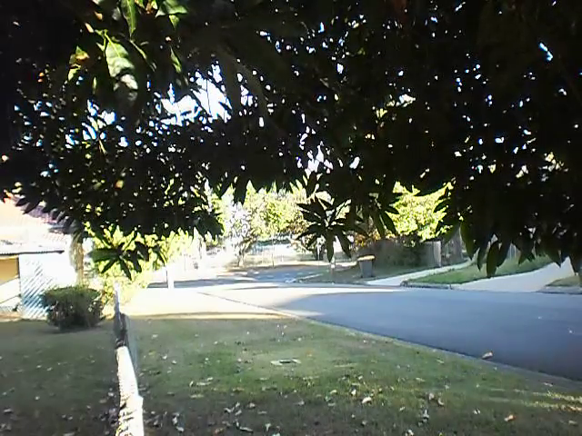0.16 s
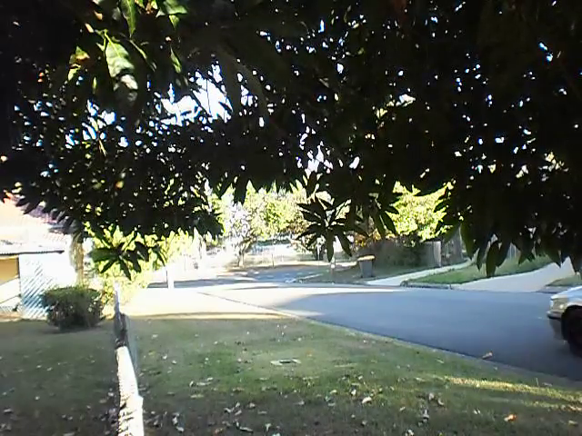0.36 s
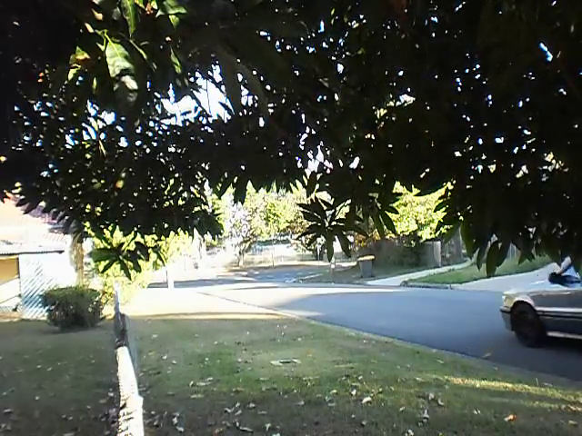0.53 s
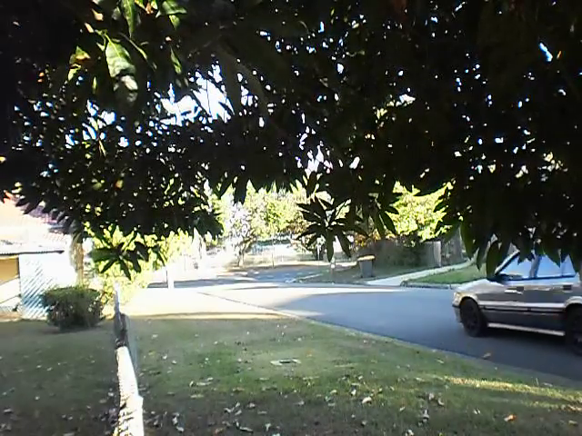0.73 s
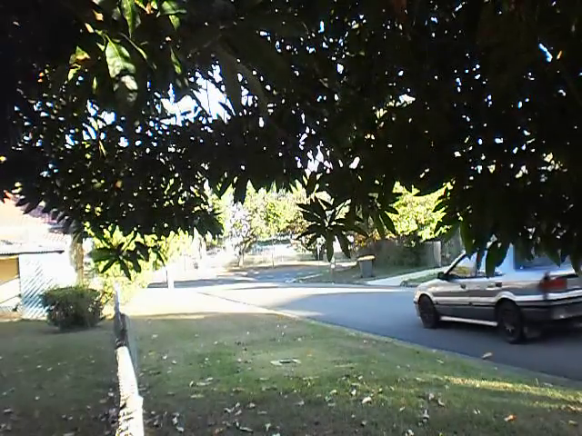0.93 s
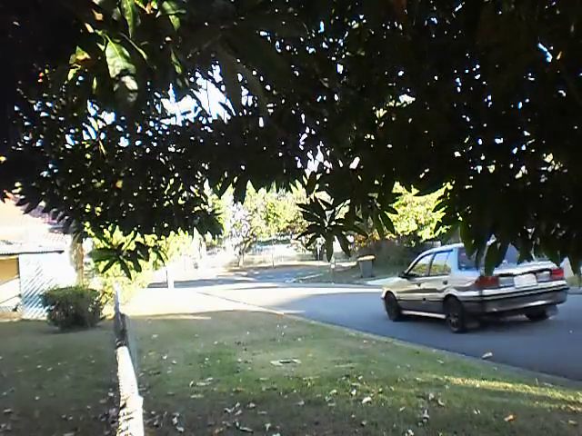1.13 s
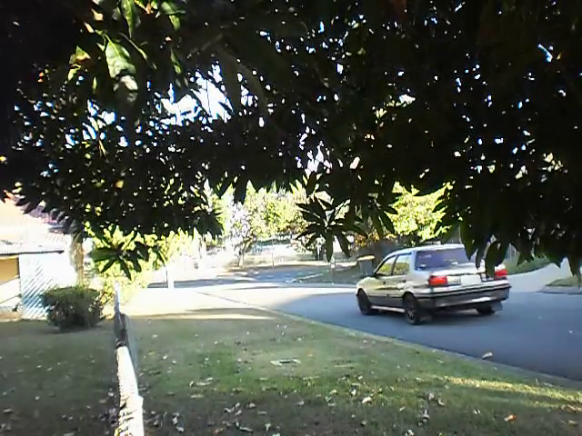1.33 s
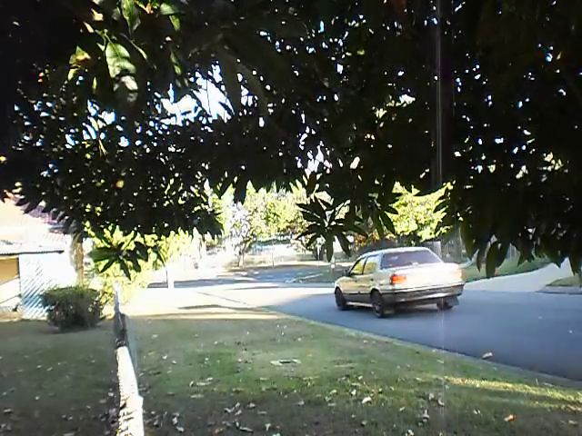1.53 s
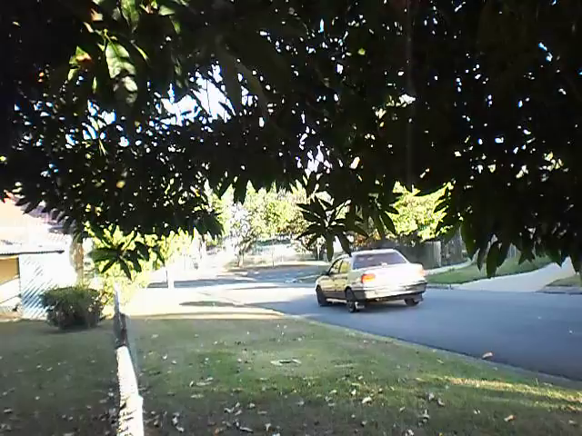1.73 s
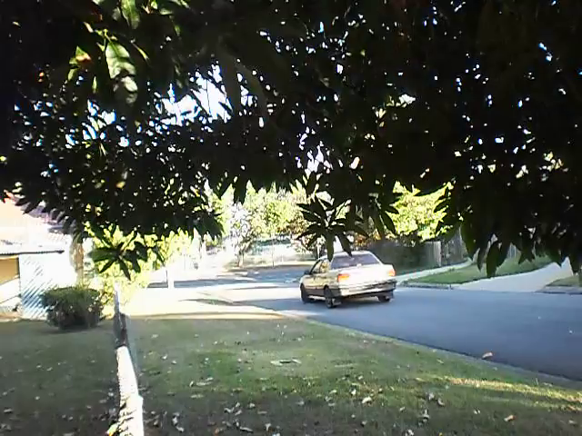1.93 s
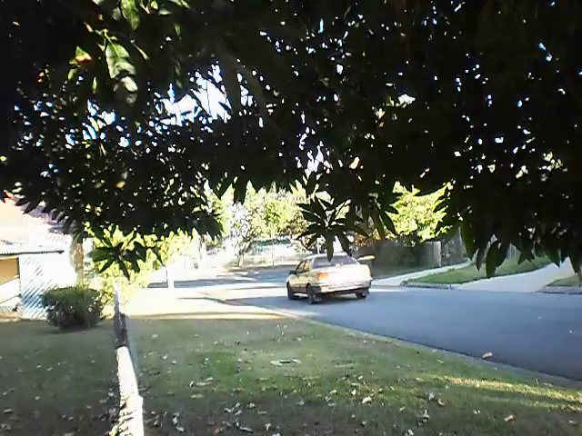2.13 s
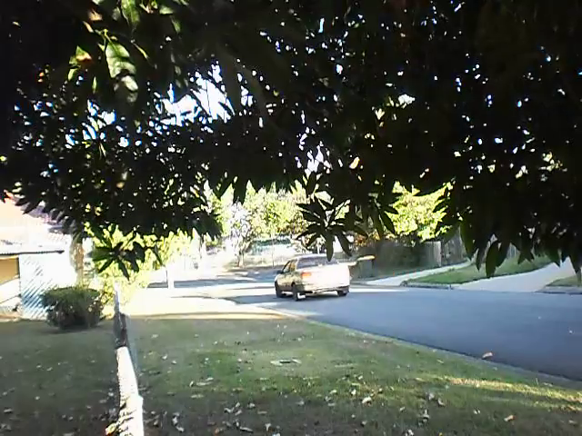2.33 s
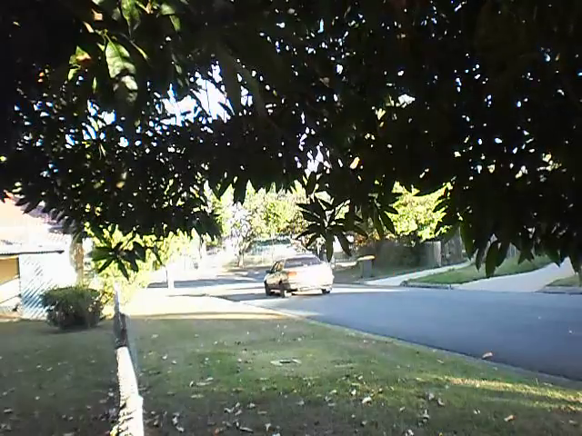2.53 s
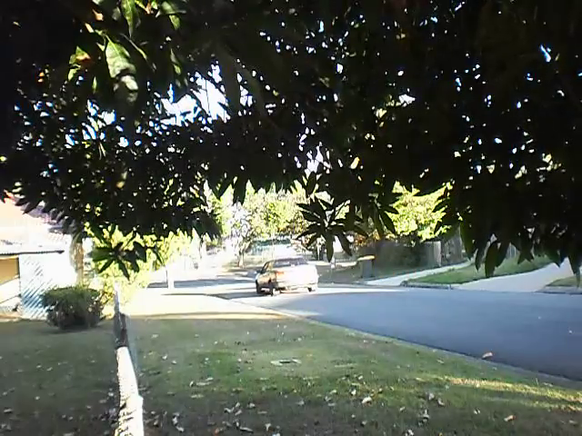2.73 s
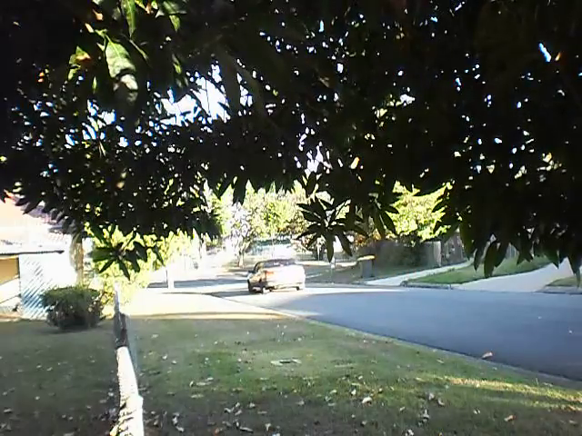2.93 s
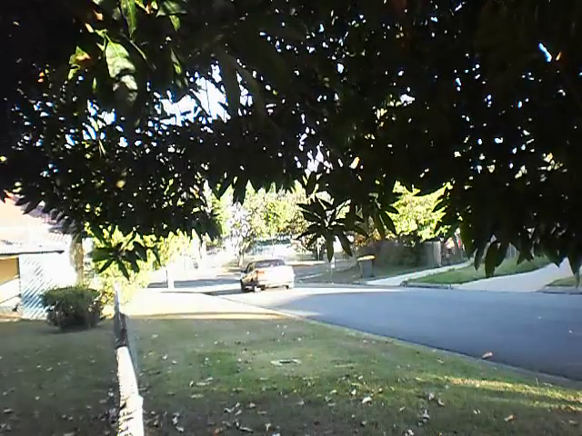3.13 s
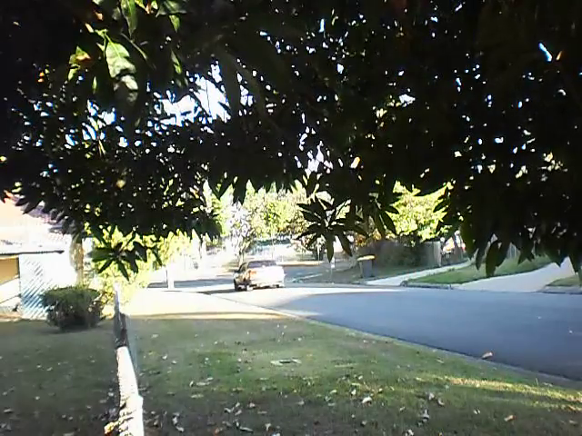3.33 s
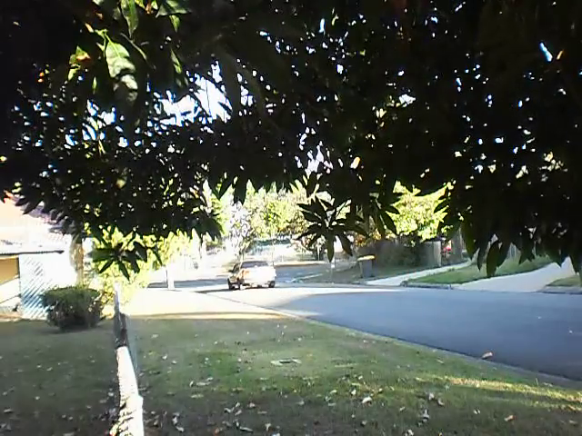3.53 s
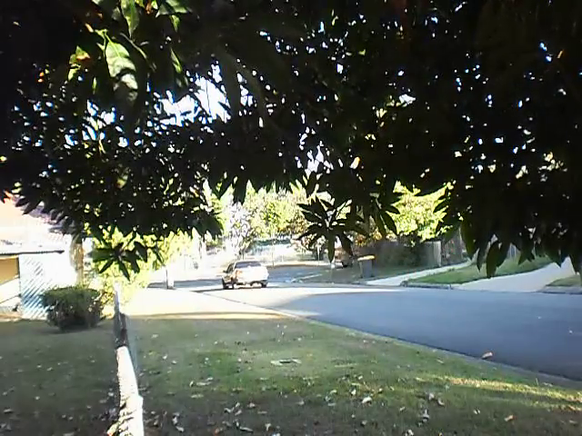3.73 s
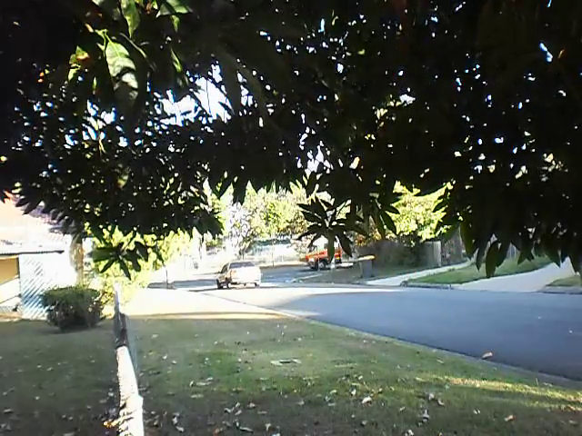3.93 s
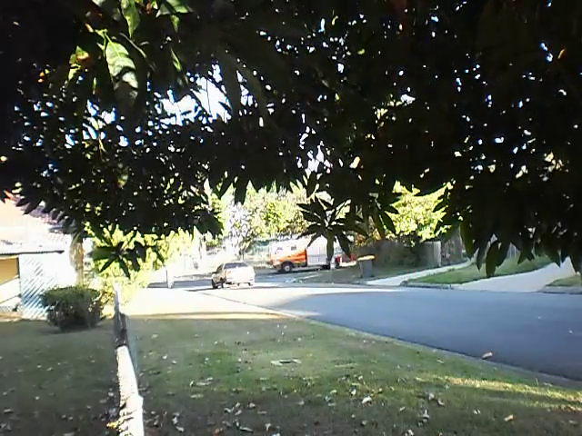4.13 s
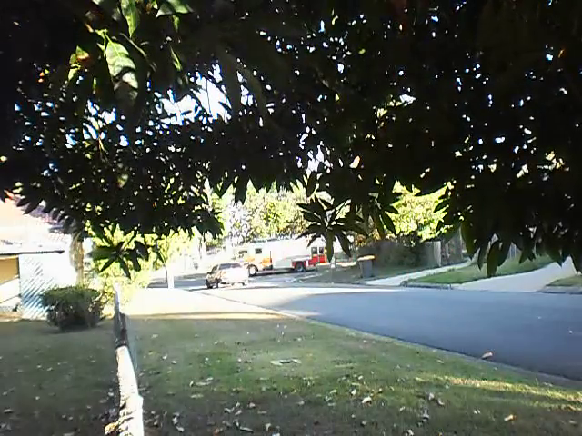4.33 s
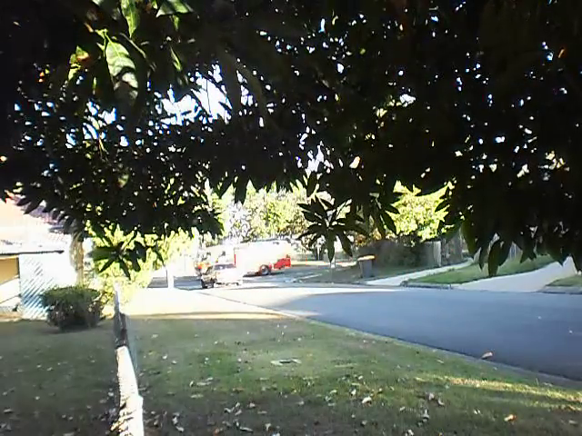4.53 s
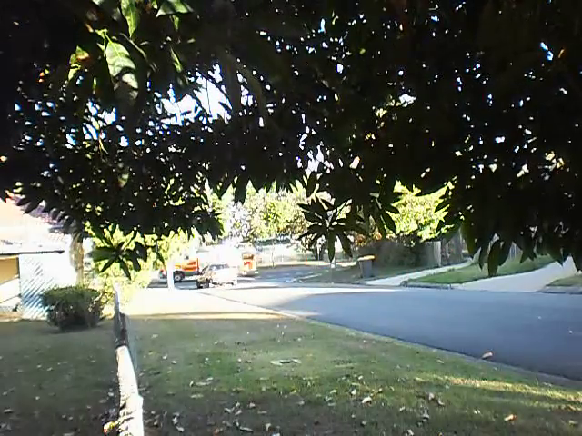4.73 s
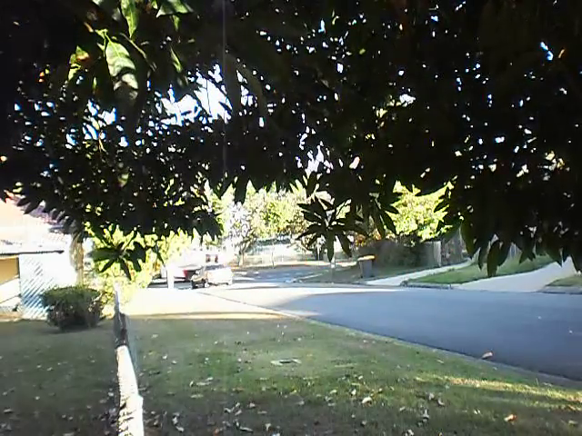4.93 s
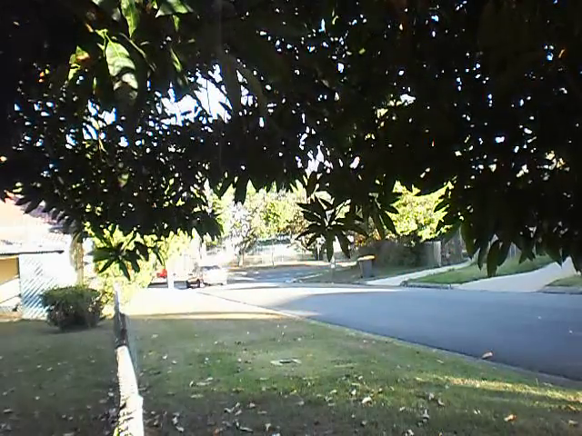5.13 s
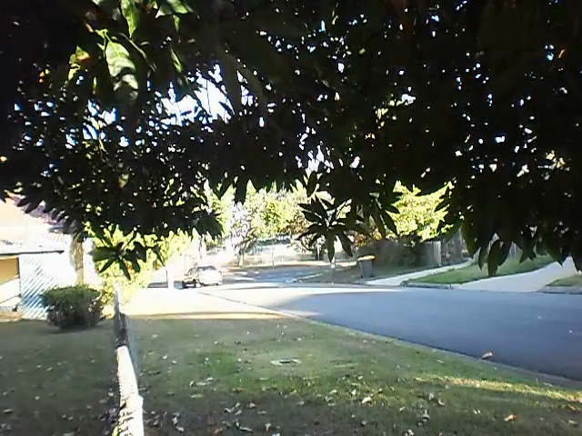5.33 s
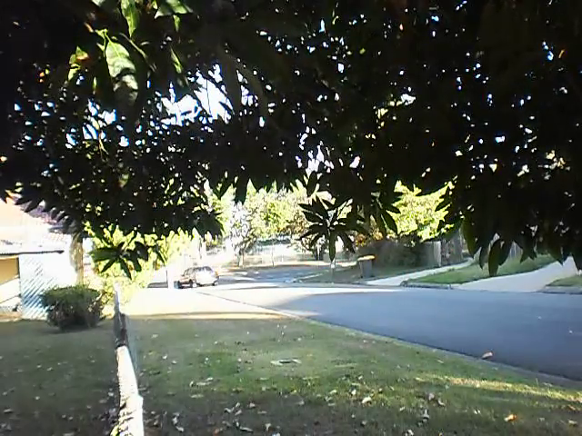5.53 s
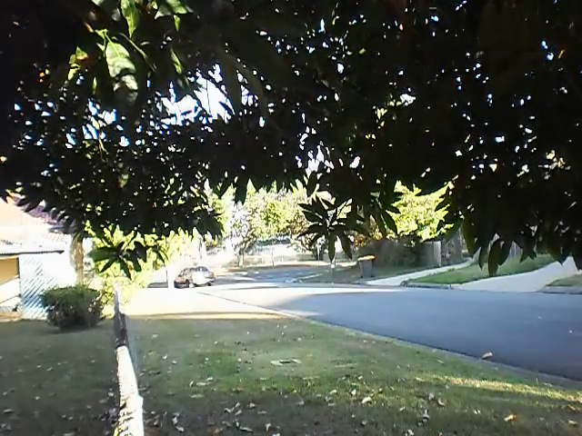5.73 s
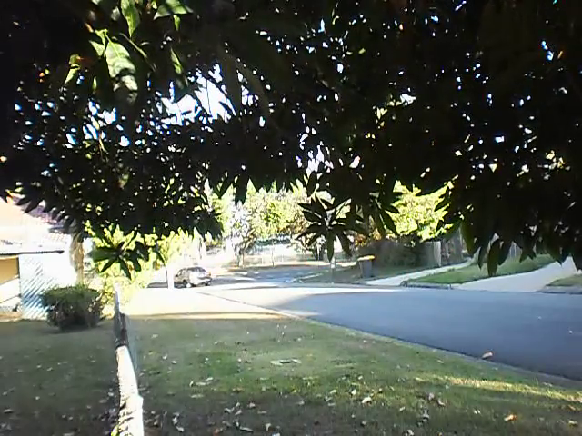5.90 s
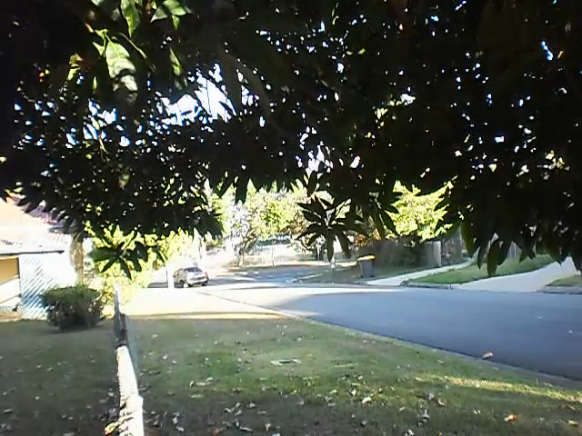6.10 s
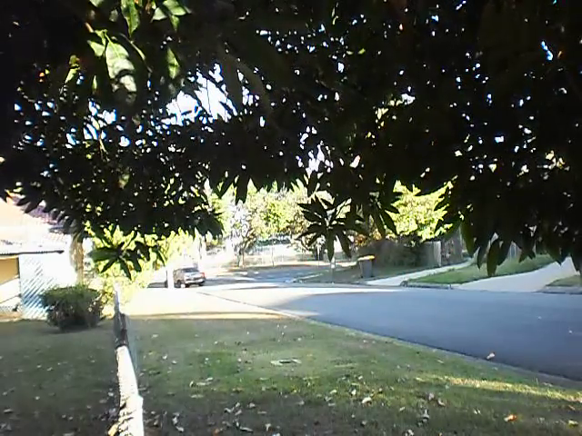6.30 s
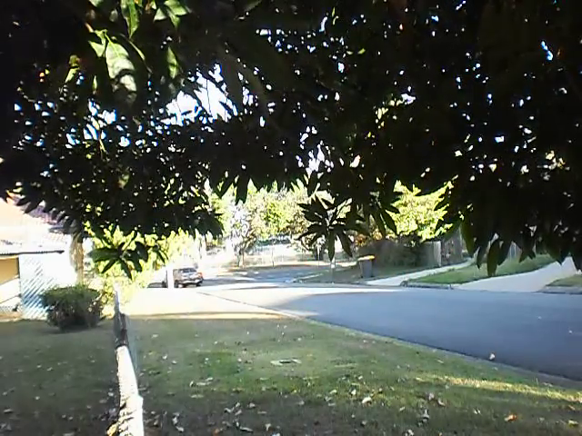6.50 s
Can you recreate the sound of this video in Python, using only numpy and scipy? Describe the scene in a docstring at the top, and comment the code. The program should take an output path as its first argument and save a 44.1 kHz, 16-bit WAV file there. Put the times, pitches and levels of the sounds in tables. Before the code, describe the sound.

Outdoors on a suburban street, a four-cylinder car passes close almost at once, its exhaust boom squared into a harsh buzz by a cheap narrow-band microphone. Revs climb to a peak after two seconds, then sink with flutter and burble as it recedes. A van drones faintly across the far junction around four seconds, and the car settles to a quiet idle.

```python
"""A car drives past and away

A four-cylinder car drives past down a street; its revs rise in one long arc and sink to idle.
Its exhaust booms at the firing rate, with a rasp and a burble, made of tones and noise shaped by the pipe.
Shaped noise makes the rush of tyres and air, and steady tones make a van that drones across the far junction.
The boom overloads a small narrow-band camera, which squares it off into a buzz until the car is far away."""
import sys
import numpy as np
from scipy import signal
from scipy.fft import rfft, irfft
from scipy.io import wavfile
from scipy.ndimage import uniform_filter1d

SR = 44100
rng = np.random.default_rng(int(sys.argv[2]) if len(sys.argv) > 2 else 0)


def persist_wave(psi):
    """Save psi, clipped to +-1, as 16-bit WAV."""
    counts = np.round(np.clip(psi, -1, 1) * 32767).astype(np.int16)
    wavfile.write(sys.argv[1], SR, np.atleast_2d(counts).T)


N = 289280
TIME = np.arange(N) / SR

TOP_HZ = 140.9  # the highest revs, in firings a second
IDLE_S = 5.6  # when the idle begins to sag and the exhaust grunts


def amp(db):
    """Turns decibels into a gain."""
    return 10 ** (np.asarray(db) / 20)


def unit(x):
    """Scales a signal to rms 1."""
    return x / np.sqrt(np.mean(abs(x) ** 2) + 1e-20)


def curve(rows, t=TIME):
    """Reads a table of (time, value) at the times t, with straight lines between its rows."""
    seconds, values = np.transpose(rows)
    return np.interp(t, seconds, values)


def colour(points, hz):
    """Gain of a spectrum given as (frequency, dB), read on a log-frequency axis."""
    f, db = np.transpose(points)
    return amp(np.interp(np.log(hz + 1), np.log(f), db))


def bell(centre, length, t=TIME):
    """A smooth bump from 0 to 1 and back."""
    return np.exp(-(2 * (t - centre) / length) ** 2)


def drift(rate, t=TIME):
    """A smooth random wander of rms about 1, moving up to roughly `rate` times a second."""
    count, points_per_s = 2048, 200
    hz = np.fft.rfftfreq(count, 1 / points_per_s)
    spectrum = rfft(rng.standard_normal(count))
    slow = irfft(spectrum / (1 + (hz / rate) ** 4))
    return np.interp(t, np.arange(count) / points_per_s, unit(slow))


def noise(shape, patchy_db, size):
    """Noise of rms 1 with the spectrum shape(Hz, s), made uneven by patches in time and frequency."""
    hop = size // 4
    t = np.arange(N // hop + 5)[:, None] * hop / SR
    hz = np.fft.rfftfreq(size, 1 / SR)
    real, imag, patches = rng.standard_normal((3, len(t), len(hz)))
    # averaging over neighbours turns single random values into broad patches
    patches = uniform_filter1d(patches, size=9, axis=0)
    patches = unit(uniform_filter1d(patches, size=9, axis=1))
    spectrum = (real + 1j * imag) * shape(hz, t) * amp(patchy_db * patches)
    _, sound = signal.istft(spectrum.T, nperseg=size, noverlap=size - hop)
    return unit(sound[:N])


def fading(scatter, rate, t=TIME):
    """Complex gain of a tone that arrives directly and by shifting paths off the road and the houses."""
    direct = np.exp(2j * np.pi * rng.random())
    scattered = scatter * (drift(rate, t) + 1j * drift(rate, t))
    return unit(direct + scattered)


def passing(closest_s, swell_s):
    """Closest distance over present distance, for a source moving along a straight line."""
    return 1 / np.hypot(1, (TIME - closest_s) / swell_s)


def nearness():
    """How near the car is: 1 as it passes, falling as 1 / distance."""
    # the car's straight path: closest at t/s, closest distance/m, speed/(m/s)
    car_path = (0.66, 4.1, 7.8)
    closest_s, closest_m, speed = car_path
    return passing(closest_s, closest_m / speed)


def shaded(in_view_s=1.003, turning_s=0.091):
    """1 while the car's body hides the tailpipe, 0 once the car is seen from behind."""
    return (1 - np.tanh((TIME - in_view_s) / turning_s)) / 2


def firing(t=TIME):
    """Firings a second: the revs climb to a top and sink in one arc, until the idle catches them."""
    top_s, start_hz = 2.27, 88.6
    # firings a second lost one second from the top, and the power of time with which the loss grows
    climb_hz, climb_power = 12.0, 1.85
    sink_hz, sink_power = 10.14, 1.75
    idle_hz, idle_sag_hz_per_s = 58.9, 5.6
    away = abs(t - top_s)
    climbing = np.maximum(TOP_HZ - climb_hz * away ** climb_power, start_hz)
    idle = idle_hz - idle_sag_hz_per_s * np.maximum(t - IDLE_S, 0)
    sinking = np.maximum(TOP_HZ - sink_hz * away ** sink_power, idle)
    return np.where(t < top_s, climbing, sinking)


def pipe(hz, t=0):
    """Gain of the tailpipe, which rings at its standing waves, the same at every moment."""
    # standing waves of the tailpipe and silencer: f/Hz, width/Hz, relative level/dB
    standing_waves = [(37, 10, 0), (108, 55, 9), (164, 38, 2), (242, 17, -11.5), (347, 41, -5.5),
                      (413, 100, -0.5), (499, 17, -3.5), (655, 510, -10), (840, 350, -18.5),
                      (1220, 300, -22)]
    power = sum(amp(db) ** 2 / (1 + (2 * (hz - f) / width) ** 2) for f, width, db in standing_waves)
    return np.sqrt(power)


def echo_fades(ripple_db=0.92, period_s=.345, trough_s=1.84, lasts_s=2):
    """Street echoes cancel the boom or add to it: a regular ripple in level, and single dips and swells."""
    # single dips and swells: centre t/s, length/s, change of level/dB
    single_fades = [(0.251, 0.17, -3), (2.61, .1, 2), (2.73, 0.18, -8.5), (2.894, .1, -11),
                    (3.304, .17, -8), (3.777, 0.22, -6.5), (3.86, 0.063, -11), (4.138, 0.14, -18),
                    (4.41, .16, -10.5), (4.747, 0.04, -14.5), (5.3, 0.12, -5.5), (5.455, 0.15, 4.5)]
    wave = np.cos(2 * np.pi * (TIME - trough_s) / period_s)
    ripple = amp(-ripple_db * bell(trough_s, lasts_s) * wave)
    gains = [1 + (amp(db) - 1) * bell(s, length) for s, length, db in single_fades]
    return ripple * np.prod(gains, axis=0)


def boom(cycles, waver_db=.5, alongside_db=-0.1, falloff=0.95, octave_db=-35, octave_fading=2,
         octave_lead_rad=.45, octave_scatter=0.2, scatter_rate=7):
    """The firing note and its wavering octave, strong beside the car and otherwise ringing in the pipe."""
    # the firing note before waver and echoes, weaker as the throttle closes: t/s, level/dB
    note_level = [(0, 9.5), (0.84, 12.5), (1.07, 6), (1.45, 3.5), (2.1, 2.0), (3.1, 3.9), (3.55, 4.1),
                  (4.2, -0.57), (4.65, -2.5), (4.9, -11.5), (5.2, -12), (5.65, -21), (6.56, -19)]
    angle, fades = 2 * np.pi * cycles, echo_fades()
    note = amp(curve(note_level) + waver_db * drift(5.9)) * fades
    beside_car = amp(alongside_db) * shaded() * nearness() ** falloff
    in_pipe = amp(octave_db) * pipe(2 * firing())
    octave = (beside_car + in_pipe) * fades ** octave_fading
    wavering = 1 + octave_scatter * (drift(scatter_rate) + 1j * drift(scatter_rate))
    octave_tone = (wavering * np.exp(1j * (2 * angle + octave_lead_rad))).real
    return note * np.cos(angle) + octave * octave_tone


def rasp_level(behind_db=-6.0, db_per_octave=7, shaded_db=-9.5, falloff=1.65):
    """The rasp grows with revs and nearness, and is held back while the tailpipe is hidden."""
    revs_db = db_per_octave * np.log2(firing() / TOP_HZ)
    return amp(behind_db + revs_db + shaded_db * shaded()) * nearness() ** falloff


def rasp(cycles, uneven_db=-10, scatter=0.54, fade_rate=3, count=48):
    """Overtones sweep through the pipe's resonances; unequal cylinders add weaker tones in between."""
    coarse_t, out = TIME[::64], np.zeros(N)
    # turbulence in the pipe shifts each pulse a little, which blurs the high tones most
    cycles = cycles + .018 * drift(30)
    for quarter in range(2, count):
        if quarter in (4, 8):
            continue  # these two are the boom
        order = quarter / 4  # multiple of the firing rate
        # whole multiples are full, halves weaker, quarters weaker still
        weight_db = 0 if quarter % 4 == 0 else uneven_db * (1 + quarter % 2)
        height = amp(weight_db) * pipe(order * firing(coarse_t)) * fading(scatter, fade_rate, coarse_t)
        tone = np.exp(2j * np.pi * order * cycles)
        out += (np.interp(TIME, coarse_t, height) * tone).real
    return rasp_level() * unit(out)


def burble(near_db=-15.0, falloff=0.85, lift_off_s=2.66, overrun_db=-23, overrun_db_per_s=-2.0, onset_s=.08):
    """Turbulent gas rings the pipe: heard close by, and again once the driver lifts off the throttle."""
    since = TIME - lift_off_s
    onset = (1 + np.tanh(since / onset_s)) / 2
    overrun = amp(overrun_db + overrun_db_per_s * since) * onset
    close_by = amp(near_db) * nearness() ** falloff
    return np.hypot(close_by, overrun) * noise(pipe, patchy_db=3.5, size=8192)


def rush_level(car_db=-23, falloff=.75, van_db=-27, van_s=4.26, van_swell_s=0.81):
    """The car's tyres fade with distance, the van's swell as it crosses; short swells add to both."""
    # short swells of the rushing noise: centre t/s, length/s, level/dB
    short_swells = [(0.45, 0.21, -24.5), (1.095, 0.26, -24), (1.95, 0.45, -31.5), (3.25, 0.73, -25.5),
                    (4.38, 0.39, -22.5), (5.0, 0.81, -30)]
    car = amp(car_db) * nearness() ** falloff
    crossing = amp(van_db) * passing(van_s, van_swell_s)
    swells = sum(amp(db) * bell(s, length) for s, length, db in short_swells)
    return np.sqrt(car ** 2 + crossing ** 2 + swells ** 2)


def rush(cycles, pulsing=0.16, far_tilt_db=-0.9837):
    """Tyre and air noise, puffing a little with each firing and growing duller as time goes on."""
    # colour of the noise before it grows duller: f/Hz, relative level/dB
    rush_colour = [(20, 0.5), (100, 2), (300, 0.5), (450, -10), (680, -6), (900, -6.5), (1280, 0.5),
                   (1600, -11), (2000, -14), (2600, -6.5), (3200, -13.5), (3800, -12.5), (4500, -39.5)]

    def shape(hz, t):
        dulling = amp(far_tilt_db * (t + 0.5) * np.log2(1 + hz / 700))
        return colour(rush_colour, hz) * dulling

    air = noise(shape, patchy_db=1.0, size=1024)
    puffs = 1 + pulsing * np.cos(2 * np.pi * cycles)
    return rush_level() * air * puffs


def wake(arrives_s=1.15, length_s=.28, level_db=-22, centre_hz=35, width_hz=12):
    """A deep rumble, one short swell of low noise, follows just behind the car."""
    def shape(hz, t):
        return bell(centre_hz, 2 * width_hz, hz)

    return amp(level_db) * bell(arrives_s, length_s) * noise(shape, patchy_db=1.0, size=8192)


def flutter(centre_hz=118, width_hz=54):
    """Short bursts of low rumbling noise roughen the boom."""
    # bursts: centre t/s, length/s, level/dB
    bursts = [(2.73, .17, -12), (2.92, .18, -14), (3.31, .09, -17), (4.2, .12, -19)]
    swell = sum(amp(db) * bell(s, length) for s, length, db in bursts)

    def shape(hz, t):
        return np.exp(-((hz - centre_hz) / width_hz) ** 4)

    return swell * noise(shape, patchy_db=-3.5, size=2048)


def van(scatter_per_order=0.091, fade_rate_per_order=2.2, appears_s=2.7, appearing_s=.2):
    """A far engine at nearly steady revs comes out from behind houses; the street blurs high tones most."""
    # the van's revs: t/s, firing rate f/Hz
    van_firing = [(3, 66.2), (4.8, 65.5), (5.4, 64.8), (5.9, 62.7), (6.56, 63.6)]
    # swells of its tones: multiple of the firing rate, peak level/dB, loudest at t/s, swell time/s
    van_orders = [(3, -30.5, 3.5, 1), (4, -23, 3.31, 0.1), (4, -24.5, 4.15, 0.35), (4, -32, 6.35, 0.34),
                  (5, -22.5, 4.6, .15), (5, -26.5, 5.3, 0.2), (8, -40.5, 3.2, .6), (10, -30.5, 4.62, 0.26)]
    cycles, out = np.cumsum(curve(van_firing)) / SR, np.zeros(N)
    for order, db, loudest_s, swell_s in van_orders:
        blur = fading(scatter_per_order * order, fade_rate_per_order * order)
        tone = np.exp(2j * np.pi * order * cycles) * blur
        out += amp(db) * passing(loudest_s, swell_s) * tone.real
    appearing = (1 + np.tanh((TIME - appears_s) / appearing_s)) / 2
    return out * appearing


def over_grass(x, low_hz=350, high_hz=520):
    """The bounce off soft ground arrives inverted in one band and hollows out a distant sound."""
    # share of that band cancelled by the bounce off the lawn: t/s, share/(0-1)
    ground_dip = [(3, 0.14), (4.8, 0.29), (5.7, 0.8), (6.56, 0.56)]
    band_pass = signal.butter(1, [low_hz, high_hz], "bandpass", fs=SR, output="sos")
    return x - curve(ground_dip) * signal.sosfilt(band_pass, x)


def grunt(cycles, level_db=-25, length_s=0.2, order=3):
    """At idle, three times the firing rate meets a standing wave of the pipe and grunts once."""
    return amp(level_db) * bell(IDLE_S, length_s) * np.cos(2 * np.pi * order * cycles)


def scene():
    """One crankshaft, turning slightly unevenly, sets the pace of the car's exhaust tones and puffs."""
    # a running count of firings, whole numbers marking full cycles
    cycles = np.cumsum(firing() * (1 + 0.0018 * drift(13.3))) / SR
    # each firing comes a little early or late, most under the hard load of pulling past
    jitter_cruising, jitter_loaded = .0045, .007  # rms shares of a cycle; the load adds the second
    load_s, load_length_s = .55, 1.4
    jitter = jitter_cruising + jitter_loaded * bell(load_s, load_length_s)
    cycles = cycles + jitter * drift(70)
    exhaust = boom(cycles) + rasp(cycles) + burble() + flutter() + grunt(cycles)
    car = exhaust + rush(cycles) + wake()
    return (over_grass(car) + van())[None]


def low_pass(x, hz, size):
    """Removes what lies above hz without smearing the timing; more taps make it steeper."""
    taps = signal.firwin(size, hz, window=("kaiser", 8), fs=SR)
    return signal.oaconvolve(x, taps[None], "same")


def record(dry, camera_rate=8000, band_hz=3900, edge_hz=16600):
    """The camera samples at a telephone rate and clips hard; its band limit overshoots and clips again."""
    instants = np.arange(0, N / SR + .01, 1 / camera_rate)
    # slightly unequal limits square off the loud boom
    overloaded = np.clip(np.interp(instants, TIME, dry[0]), -.7065, .7015)
    # 8000 * 441 / 80 = 44100 samples a second
    smoothing = signal.firwin(441 * 20 + 1, band_hz, window=("kaiser", 8), fs=441 * camera_rate)
    narrow = signal.resample_poly(overloaded, 441, 80, window=smoothing)[None, :N]
    # cutting the overshoots leaves faint ticks
    ticking = np.clip(narrow, -.707, .707)
    return low_pass(ticking, edge_hz, size=511)


dry = scene()
out = record(dry)
persist_wave(out)
```